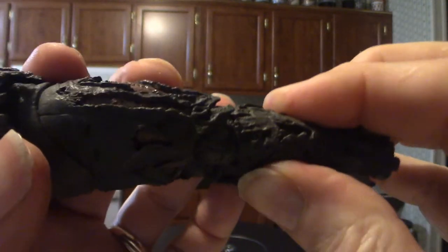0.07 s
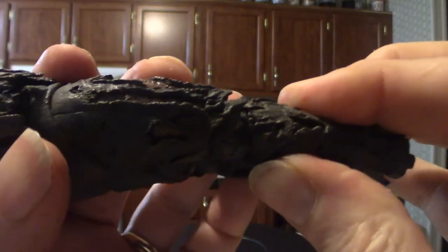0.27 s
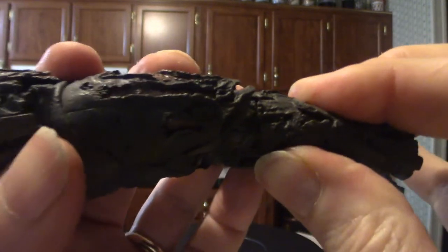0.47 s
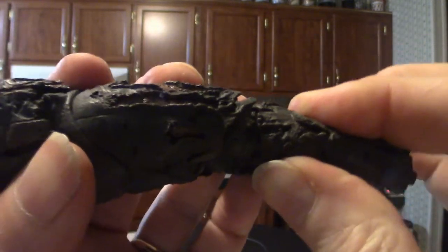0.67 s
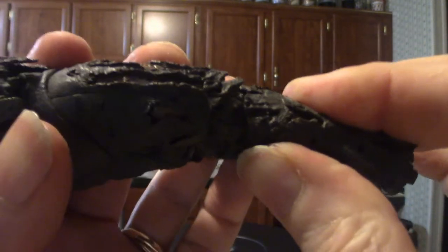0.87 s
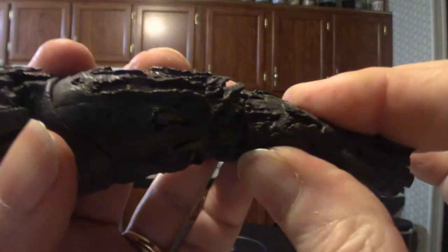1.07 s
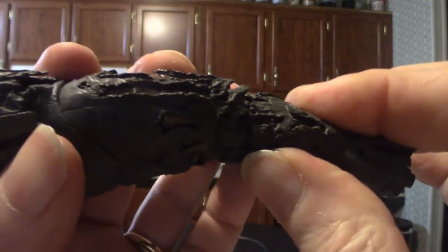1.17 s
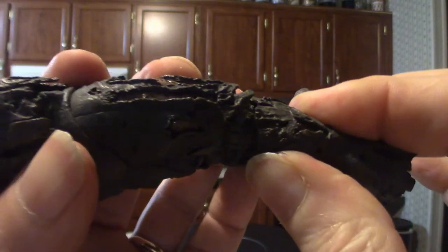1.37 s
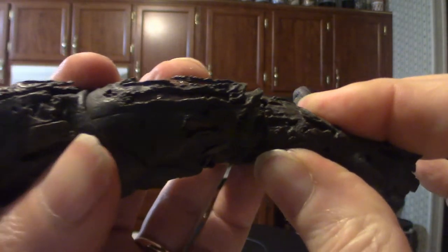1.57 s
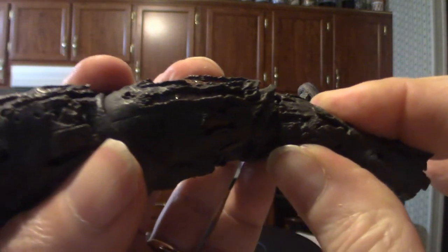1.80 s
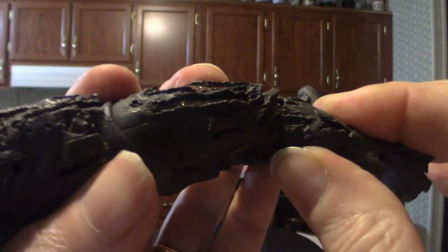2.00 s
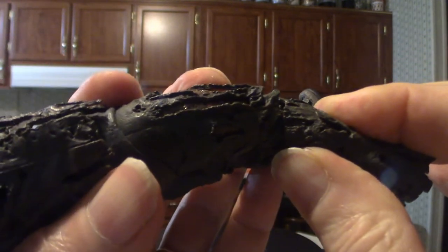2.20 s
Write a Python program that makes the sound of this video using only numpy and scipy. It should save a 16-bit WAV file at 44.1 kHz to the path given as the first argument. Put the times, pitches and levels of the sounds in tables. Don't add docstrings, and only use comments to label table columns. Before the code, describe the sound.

Hands flex a stiff hollow plastic figure up close indoors; parts rattle lightly, crisp dry clicks come unevenly with one dull knock, then a rapid clicking run eases off to a last light knock.

```python
import sys
import numpy as np
from scipy import signal
from scipy.fft import rfft, irfft, next_fast_len
from scipy.io import wavfile
from scipy.ndimage import uniform_filter1d, map_coordinates

SR = 44100
rng = np.random.default_rng(int(sys.argv[2]) if len(sys.argv) > 2 else 0)


def decibels_to_gain(level_db):
    exponent = np.asarray(level_db, float) / 20
    return 10 ** exponent


def unload_wav(signal):
    wavfile.write(
        sys.argv[1],
        SR,
        np.round(np.clip(np.atleast_2d(signal).T, -1, 1) * 32767).astype(np.int16),
    )


N = 99048


def unit(x):
    return x / np.sqrt(np.mean(x ** 2) + 1e-20)


def along(points, hz):
    f, value = np.transpose(points)
    return np.interp(np.log(hz + 1), np.log(f + 1), value)


def filtered(x, response):
    size = next_fast_len(x.shape[-1] + 8192)
    spectrum = rfft(x, size) * response(np.fft.rfftfreq(size, 1 / SR))
    return irfft(spectrum, size)[..., :x.shape[-1]]


def pair(alike, size):
    def mid_and_side(hz):
        angle = np.arccos(np.clip(along(alike, hz), -1, 1)) / 2
        return np.array([np.cos(angle), np.sin(angle)])

    mid, side = filtered(rng.standard_normal((2, size)), mid_and_side)
    return np.array([mid + side, mid - side])


def air():
    # frequency in Hz, level in dB per Hz.
    colour = [(15, -34), (25, -15.5), (339, -10), (389, -8), (524, -15.5), (766, -16.5), (1030, -19.5),
              (13600, -40), (16500, -92)]
    # frequency in Hz, left-right likeness as a correlation.
    alike = [(60, 0.018), (240, 0.08), (950, 0.57), (3770, 0.78), (15000, 0.77)]
    level_db = -56.5
    sway_db = 1.67 * map_coordinates(rng.standard_normal(40), [np.arange(N) * 9 / SR])
    noise = unit(filtered(pair(alike, N), lambda hz: decibels_to_gain(along(colour, hz))))
    return noise * decibels_to_gain(level_db + sway_db)


def grainy(effort, colour, alike, grain_samples):
    s, db = np.transpose(effort)
    grain_db = 4 * map_coordinates(rng.standard_normal(N // 50), [np.arange(N) / grain_samples])
    noise = unit(filtered(pair([(1000, alike)], N), lambda hz: decibels_to_gain(along(colour, hz))))
    level_db = np.interp(np.arange(N) / SR, s, db, -120, -120)
    return unit(noise * decibels_to_gain(grain_db)) * decibels_to_gain(level_db)


def gripping_hands():
    # time in seconds, level in dB.
    effort = [
        (0, -70),
        (.7, -64),
        (.9, -46),
        (1.15, -82),
        (1.4, -58.5),
        (1.65, -52),
        (1.95, -55.5),
        (2.25, -65),
    ]
    # frequency in Hz, level in dB per Hz.
    colour = [(60, -23), (110, -7), (300, -6.5), (600, -1.5), (1200, -20)]
    return grainy(effort, colour, alike=.7, grain_samples=900)


def rubbing_fingers():
    # time in seconds, level in dB.
    stroke = [
        (.2, -77),
        (.3, -56.5),
        (.36, -69),
        (0.409, -43.5),
        (.46, -53),
        (.52, -68),
        (.7, -67),
    ]
    # frequency in Hz, level in dB per Hz.
    colour = [(300, 6.5), (2200, 16.5), (6000, -1), (12000, -26), (16500, -34)]
    return grainy(stroke, colour, alike=.85, grain_samples=100)


def add(track, s, sound):
    part = track[..., int(s * SR):][..., :sound.shape[-1]]
    part += sound[..., :part.shape[-1]]


def room(sound, source=None):
    # frequency in Hz, time to fall 60 dB in seconds.
    kitchen = [(200, 0.11), (1000, 0.12), (2500, 0.28), (6000, 0.25), (14000, 0.093)]
    # frequency in Hz, level of the tail in dB.
    wet_colour = [(200, -16), (1000, -5.5), (1850, -10), (2600, 6.5), (3700, -8.5), (5500, -9),
                  (8300, -9.5), (14000, -7.5)]
    wet_db, alike, delay_ms = -14, 0.95, 4.1
    hz, t, z = signal.stft(pair([(1000, alike)], SR // 3), SR, nperseg=128)
    tail_db = along(wet_colour, hz)[:, None] - 60 * t / along(kitchen, hz)[:, None]
    tail = signal.istft(z * decibels_to_gain(tail_db), SR, nperseg=128)[1]
    tail = np.pad(tail / np.linalg.norm(tail[0]), ((0, 0), (int(delay_ms * SR / 1e3), 0)))
    if source is None:
        source = sound
    wet = decibels_to_gain(wet_db) * signal.fftconvolve(source.mean(0)[None], tail, axes=1)
    return wet + np.pad(sound, ((0, 0), (0, wet.shape[1] - sound.shape[1])))


def ticks():
    # start in seconds, peak in dB, centre in Hz, time to fall 60 dB in ms.
    events = [(0.0743, -53, 14000, 8), (0.262, -51, 3040, 21), (.3033, -25.5, 10500, 12),
              (0.317, -40.5, 3260, 9), (.373, -33, 7000, 5), (.3753, -28, 6000, 11),
              (0.399, -25, 7060, 9.3), (.4115, -26.5, 6940, 14), (0.4187, -30, 4450, 22),
              (0.4257, -31, 5160, 15), (0.4319, -29, 4300, 19), (0.444, -39, 9900, 20),
              (0.454, -30, 6500, 20), (0.6147, -46.5, 9700, 11), (.8895, -21.5, 4840, 25),
              (1.215, -55.5, 6950, 9.8), (1.272, -44, 5500, 4.2), (2.218, -37.5, 3370, 11)]
    octaves_wide, floor_db, spike_ms, rustle_db = 1.05, -27, 2.5, -4
    out, t = np.zeros((2, N)), np.arange(SR // 10) / SR
    for s, db, centre_hz, t60_ms in events:
        def band(hz):
            hump = np.exp(-(np.log2((hz + 1) / centre_hz) / octaves_wide) ** 2)
            return hump + decibels_to_gain(floor_db) * (hz > 700)

        spike = decibels_to_gain(-60e3 * t / spike_ms)
        rustle = decibels_to_gain(rustle_db - 60e3 * t / t60_ms)
        noise = unit(filtered(pair([(1000, 0.89)], len(t)), band))
        add(out, s, room(decibels_to_gain(db) * (spike + rustle) * noise))
    return out


def ring(t, hz, db, t60_ms, rise_ms):
    t = np.maximum(t, 0)[:, None]
    decay = decibels_to_gain(db - 60e3 * t / t60_ms)
    rise = 1 - np.exp(-1e3 * t / rise_ms)
    return (decay * np.sin(2 * np.pi * hz * t) * rise).sum(1)


def knocks():
    # start in seconds, peak in dB, weight of the low modes in dB, pitch ratio.
    events = [
        (0.4543, -16.5, -2.5, 1.15),
        (0.8894, -4, -4, 1),
        (2.2177, -17, -10, 1.36),
    ]
    # mode in Hz, level in dB, time to fall 60 dB in ms.
    body = [(130, -19.5, 89), (246, -9.5, 22), (347, -14.5, 14), (487, -4, 7.2), (866, 8.5, 2.96),
            (1204, 5.5, 4)]
    rise_ms, to_room_db = 1.1, -3
    out, t = np.zeros((2, N)), np.arange(SR // 10) / SR
    hz, level_db, t60_ms = np.transpose(body)
    for s, db, low_db, ratio in events:
        mode_db = db + level_db + low_db * (hz < 420)
        knock = ring(t, hz * ratio, mode_db, t60_ms, rise_ms) * decibels_to_gain([[-.4], [.4]])
        add(out, s, room(knock, source=knock * decibels_to_gain(to_room_db)))
    return out


def joint():
    # start in seconds, peak in dB.
    slips = [
        (0.7333, -11.1),
        (0.8083, -9.9),
        (0.8448, -9.2),
        (0.8704, -9.2),
        (0.9276, -8.3),
        (1.062, -8.4),
        (1.3061, -7.4),
        (1.4024, -6.8),
             (1.4533, -7.0), (1.4833, -6.6), (1.5102, -5.0), (1.5322, -6.3), (1.5505, -5.5),
                 (1.5695, -6.2), (1.5877, -7.4), (1.6066, -6.4), (1.6293, -6.1), (1.6558, -5.3),
                 (1.6872, -6.4), (1.7227, -5.9), (1.7521, -6.1),
             (1.7784, -6.9), (1.8008, -7.4), (1.8235, -6.9), (1.8489, -7.6), (1.8722, -8.4),
                   (1.8952, -7.7), (1.9221, -8.4), (1.9625, -9.0), (2.0232, -8.8), (2.0777, -9.3),
                   (2.1634, -12.7)]
    # mode in Hz, level in dB, time to fall 60 dB in ms.
    modes = [(400.0, -42.5, 2.5), (1120.0, -26.0, 2.0), (1990.0, -15.6, 7.0), (2830.0, -7.0, 6.0),
             (3960.0, -16.6, 5.9), (4690.0, -0.0, 1.6), (6190.0, -14.7, 5.0), (8260.0, 6.9, 2.2),
             (10680.0, -6.2, 2.0), (12030.0, -18.7, 5.0), (13930.0, -6.0, 1.9)]
    # delay in ms, level in dB, tilt in dB per octave.
    paths = [
        (0, 0, 0),
        (.183, -5.8, -4),
        (1.4, -11.5, -3.2),
        (1.93, -17.3, -2),
        (2.2, -21, -.3),
        (3.04, -22.5, 2.9),
        (3.85, -28.4, 3),
        (4.55, -28, -2),
    ]
    # left over right in dB, left lag in ms.
    bearings = [(-1.5, .006), (-1.5, .006), (1.5, .015), (-3, -.015), (3, .02), (-3, .02), (3, -.02),
                (-3, .02)]
    # time in seconds, 8 kHz mode in dB, higher modes in dB.
    turn = [
        (.73, -2, 2.1),
        (1.06, 0.8, 4.5),
        (1.3, -0.9, 2.5),
        (1.65, 0.15, -0.9),
        (2.16, -1, -3),
    ]
    slip_db, scatter_db, detune, sag_per_s = 10.5, .6, .003, .012
    start_ms, rise_ms = .077, .58

    out, n = np.zeros((2, N)), np.arange(SR // 70)
    hz, level_db, t60_ms = np.transpose(modes)
    octaves = np.log2(hz / 8000)
    when, peak_db, top_db = np.transpose(turn)
    for s, db in slips:
        luck = rng.standard_normal((2, len(hz)))
        pitch = hz * (1 - sag_per_s * (s - 1.5) + detune * luck[0])
        treble_db = [np.interp(s, when, top_db), np.interp(s, when, peak_db)]
        mode_db = db + slip_db + level_db + scatter_db * luck[1]
        mode_db = mode_db + np.select([hz > 9500, hz > 7500], treble_db)
        t = (n - s * SR % 1) / SR
        arrivals = []
        for (ms, path_db, tilt_db), (pan_db, lag_ms) in zip(paths, bearings):
            ears = []
            for ear in (1, -1):
                delay_ms = start_ms + ms + ear * lag_ms / 2
                heard_db = mode_db + path_db + ear * pan_db / 2 + tilt_db * octaves
                ears.append(ring(t - delay_ms / 1e3, pitch, heard_db, t60_ms, rise_ms))
            arrivals.append(ears)
        arrivals = np.array(arrivals)
        add(out, s, room(arrivals.sum(0), source=arrivals[0] + arrivals[1]))
    return out


def scene():
    low_cut_hz = 125
    figure = filtered(ticks() + knocks() + joint(), lambda hz: (1j * hz / (low_cut_hz + 1j * hz)) ** 3)
    return figure + rubbing_fingers() + gripping_hands() + air()


def smear(x):
    # frequency in Hz, noise in dB relative to the sound.
    noise_db = [(200, -19), (1000, -16), (3000, -13), (5500, -13), (8300, -16), (11000, -12), (15000, -11)]
    block, block_start, spread_bins = 1024, 736, 60
    lead = block - block_start
    window = np.sin(np.pi * (np.arange(2 * block) + .5) / (2 * block))
    hz, t, z = signal.stft(np.pad(x, ((0, 0), (lead, 0))), SR, window, 2 * block)
    power = np.abs(uniform_filter1d(np.abs(z) ** 2, spread_bins, axis=1))
    size = np.sqrt(power) * decibels_to_gain(along(noise_db, hz))[:, None]
    noise = size * np.exp(2j * np.pi * rng.random(z.shape))
    return x + signal.istft(noise, SR, window, 2 * block)[1][:, lead:lead + N]


def band_limit(x):
    return signal.sosfilt(signal.butter(12, 16970, fs=SR, output="sos"), x)


def record(dry):
    mic_low_hz, top_hz = 52.4, 16700

    def band(hz):
        return (hz < top_hz) * (1j * hz / (mic_low_hz + 1j * hz)) ** 2

    return band_limit(filtered(smear(dry), band))


dry = scene()
out = record(dry)
unload_wav(out)
```